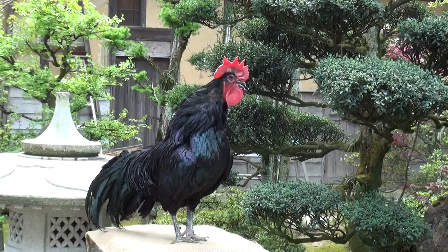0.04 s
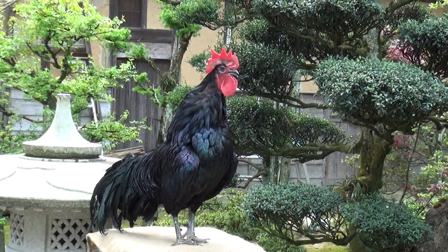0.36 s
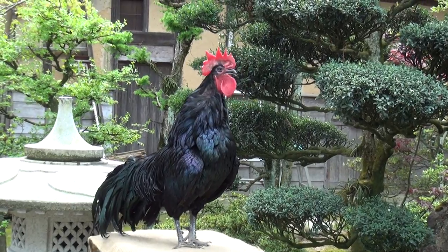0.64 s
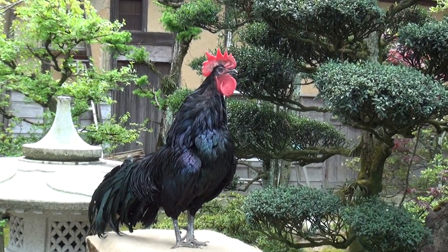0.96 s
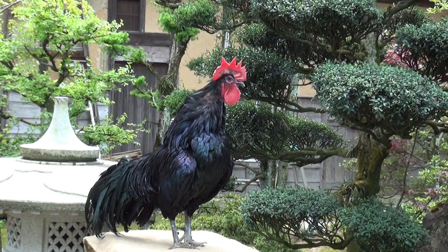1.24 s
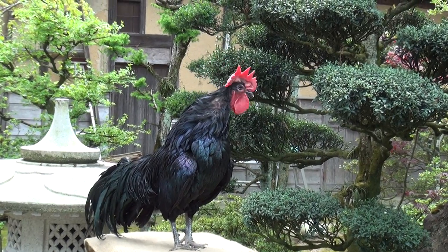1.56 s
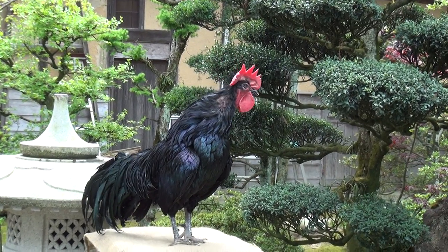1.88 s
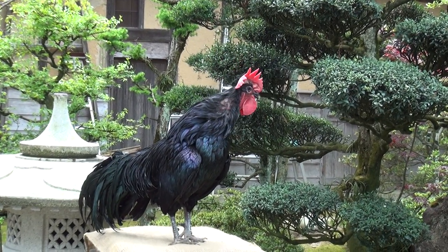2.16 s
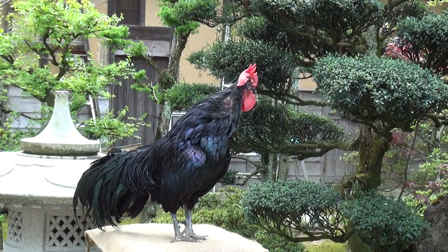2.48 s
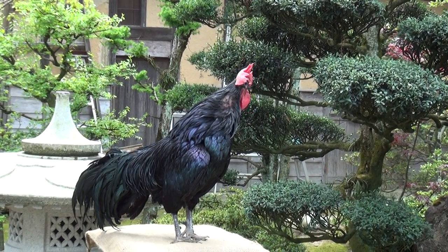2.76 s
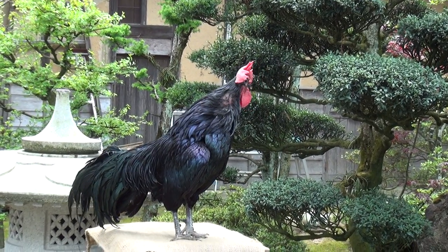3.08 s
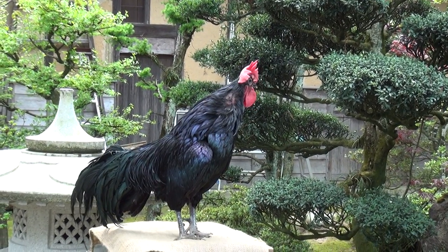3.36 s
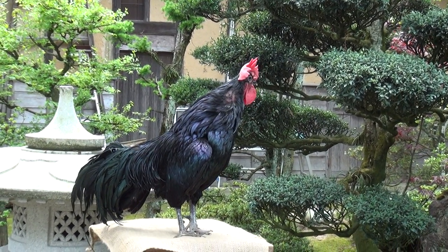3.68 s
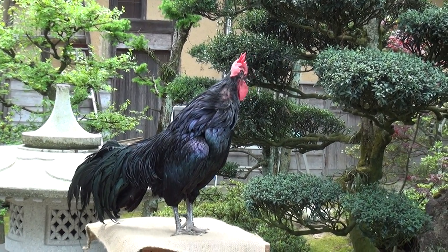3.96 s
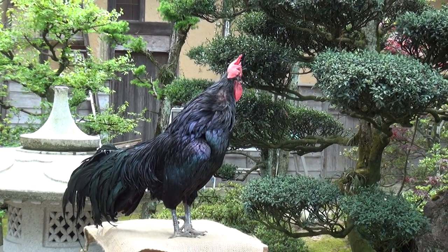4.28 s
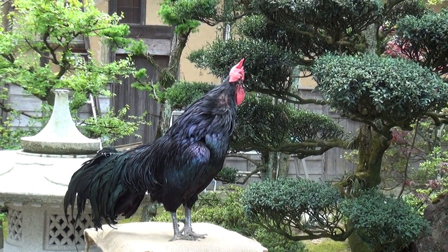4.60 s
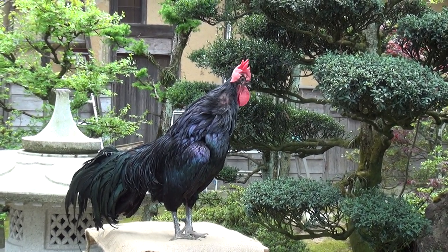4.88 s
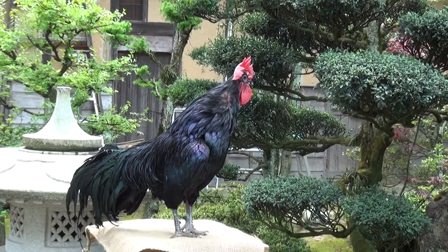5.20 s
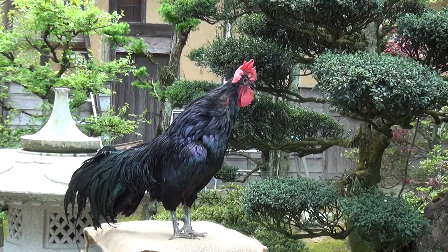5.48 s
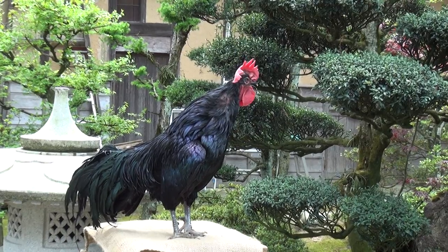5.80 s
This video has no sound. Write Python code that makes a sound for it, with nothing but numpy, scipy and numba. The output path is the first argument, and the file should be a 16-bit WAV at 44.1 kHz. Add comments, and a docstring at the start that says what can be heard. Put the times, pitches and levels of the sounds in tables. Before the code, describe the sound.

A close rooster crows three opening notes, then one very long harsh rasp, outdoors over a faint town rumble.

```python
"""A low town rumble and a brush of feathers, then a rooster crows close to the microphone in a walled
garden: a short note, a second that cracks upward, a clear one, then a very long rasp.
His syrinx swings regularly or breaks into chaotic beats; its pulses ring a throat and beak whose
resonances slide as he stretches his neck and runs out of air. The walls answer softly behind him."""
import sys
import numpy as np
from scipy import signal
from scipy.fft import rfft, irfft
from scipy.io import wavfile
from scipy.ndimage import uniform_filter1d, map_coordinates
from numba import njit

SR = 44100
rng = np.random.default_rng(int(sys.argv[2]) if len(sys.argv) > 2 else 0)


def file_out(sig):
    """Save sig as 16-bit WAV at sys.argv[1]."""
    # one column per channel
    cols = np.atleast_2d(sig).T
    # limit, then scale
    lim = np.clip(cols, -1, 1)
    pcm = np.round(lim * 32767).astype(np.int16)
    wavfile.write(sys.argv[1], SR, pcm)


N = 266364
TIME = np.arange(N) / SR


def undb(db):
    """Decibels to gain."""
    return 10 ** (np.asarray(db) / 20)


def curves(table):
    """The columns of a table, joined by straight lines in time."""
    times, *columns = np.transpose(sorted(table))
    return [np.interp(TIME, times, column) for column in columns]


def unit(x):
    """Scale to rms 1."""
    return x / np.std(x)


def steady(x, span_s):
    """Hold the rms at 1 over a sliding span."""
    size = max(int(span_s * SR), 8)
    power = uniform_filter1d(uniform_filter1d(x * x, size), size)
    return x / np.sqrt(np.abs(power) + 1e-14)


def wander(rate_hz):
    """Smooth random drift of spread 1."""
    return unit(map_coordinates(rng.standard_normal(8192), [TIME * rate_hz], order=3, mode="wrap"))


@njit
def bandpass(x, hz, width):
    """State-variable filter with moving centre and width, gain 1 at the centre."""
    y, band_state, low_state = np.empty(len(x)), 0., 0.
    for i in range(len(x)):
        g, damping = np.tan(np.pi * min(hz[i], .45 * SR) / SR), width[i] / hz[i]
        band = (band_state + g * (x[i] - low_state)) / (1 + g * (g + damping))
        band_state, low_state = 2 * band - band_state, low_state + 2 * g * band
        y[i] = damping * band
    return y


def resonate(x, hz, width):
    """A resonance with steep skirts."""
    hz, width = hz + np.zeros(N), width + np.zeros(N)
    return bandpass(bandpass(x, hz, width), hz, width)


def tract(x, modes, neck):
    """Parallel resonances of alternating sign that slide from the upright to the stretched posture."""
    return sum((-1) ** k * undb(db0 + (db1 - db0) * neck) * resonate(x, hz0 + (hz1 - hz0) * neck, width)
               for k, (hz0, hz1, width, db0, db1) in enumerate(modes))


def pulses(cycles, rough, scatter, uneven):
    """One sharp pulse a cycle; roughness scatters its moment and its size."""
    chance = rng.standard_normal((4400, 2))[:int(cycles[-1])]
    beat = np.arange(len(chance))
    wild = np.interp(beat, cycles, rough)
    at = np.interp(beat + scatter * wild * chance[:, 0], cycles, np.arange(N))
    taps = at.astype(int)[:, None] + np.arange(-7, 9)
    offset = taps - at[:, None]
    shape = np.sinc(offset) * np.cos(np.pi * offset / 16) ** 2
    size = 1 + uneven * wild * chance[:, 1]
    return np.bincount(np.clip(taps, 0, N - 1).ravel(), (shape * size[:, None]).ravel(), N)


# spectrum of the town beyond the walls: f/Hz, relative level/dB
TOWN_SPECTRUM = [(25, -21), (50, -6), (80, -6), (125, 1.5), (160, 1), (210, -4), (285, 1.5), (400, -11),
                 (800, -9.5), (1600, -19.5), (3000, -26.5), (8000, -32), (17000, -42)]
# swells of its rumble: t/s, half-width/s, rise/dB
TOWN_SWELLS = [(1.539, 0.28, 6), (4.1, 0.25, 4), (6.004, 0.095, 4)]


def town(level_db):
    """A distant, slowly swelling rumble, nearly alike in both capsules."""
    hz, db = np.transpose(TOWN_SPECTRUM)
    colour = undb(np.interp(np.log(np.fft.rfftfreq(N, 1 / SR) + 1), np.log(hz), db))
    mid, side = irfft(rfft(rng.standard_normal((2, N))) * colour, N)
    swell_db = sum(rise_db * np.exp(-((TIME - t) / width) ** 2) for t, width, rise_db in TOWN_SWELLS)
    rumble = unit(mid) * undb([[-1.4], [1.2]]) + undb(-17.5) * unit(side) * [[1], [-1]]
    return undb(level_db + swell_db) * rumble


def far_wall(x, delay_s, level_db):
    """The far wall sends one late, dull echo back to the microphone."""
    dull = signal.sosfilt(signal.butter(2, 900, fs=SR, output="sos"), x)
    return undb(level_db) * np.interp(TIME - delay_s, TIME, dull, left=0)


def garden(x, t60_s, wet_db, side_db):
    """Soft, scattered echoes from the walls and shrubs around the microphone."""
    t = TIME[:SR]
    tails = rng.standard_normal((2, SR)) * undb(-60 * t / t60_s) * (t > .008)
    tails = signal.sosfilt(signal.butter(1, 6000, fs=SR, output="sos"), tails)
    mid, side = (signal.fftconvolve(x, tail / np.linalg.norm(tail))[:N] for tail in tails)
    return undb(wet_db) * (mid + undb(side_db) * side * np.array([[1], [-1]]))


# reflections off the perch and nearby stone: delay with neck stretched/s, upright gain, stretched gain
NEAR_REFLECTIONS = [(.00115, 0.47, 0.083), (.00424, 0.28, 0.44), (.0045, .15, 0.05), (.0087, 0.2, 0.54)]


def near_stone(x, neck):
    """Close reflections comb the treble; their paths and strengths change as the head moves."""
    path = 1 + 0.139 * (1 - neck) + 0.0034 * wander(2.72)
    return x + sum((up + (out - up) * neck) * map_coordinates(x, [(TIME - delay * path) * SR], order=2)
                   for delay, up, out in NEAR_REFLECTIONS)


# rustles close to the microphone: t/s, length/s, level/dB
FEATHER_RUSTLES = [(0.139, 0.0037, -55), (0.33, 0.0049, -56), (1.068, 0.021, -44), (1.174, 0.0067, -34.5),
                   (1.193, 0.01, -43), (1.499, 0.11, -53)]


def feathers():
    """Brief, grainy brushes of stiff feathers."""
    strength = sum(undb(db) * np.exp(-2 * ((TIME - t) / length) ** 2)
                   for t, length, db in FEATHER_RUSTLES)
    grains = rng.standard_normal(N) * undb(4.1 * wander(1100))
    return strength * unit(resonate(grains, 2300, 2800) + 0.23 * resonate(grains, 12500, 14000))


# the bird's posture on the perch: t/s, stretch (0 upright, 1 stretched)
NECK_STRETCH = [(.2, 0.12), (.32, 0.18), (1.05, 0.17), (1.8, 0.17), (2.2, 0.61), (2.7, 0.81), (3.6, 0.75),
                (4.2, 1)]


def posture():
    """He stretches his neck as the crow goes on."""
    return curves(NECK_STRETCH)[0]


# the three opening notes, levels relative:
# start/s, end/s, attack/s, release/(dB/s), voice/dB, buzz/dB, beak ring/dB, top treble/dB
OPENING_NOTES = [(.197, 0.295, 0.013, 651, -20, -28.5, 17.5, -10),
                 (.456, 0.599, 0.02196, 110.5, -17.5, -26, -4.5, -25),
                 (.65, 1.056, 0.1362, 129.5, -18.5, -28, -18, -55)]
# effort in the long rasp, levels relative: t/s, voice/dB, buzz/dB
RASP_EFFORT = [(1.2, -30.5, -38.5), (1.65, -30, -38), (2.0, -28, -32), (2.2, -24.5, -32), (3.1, -21, -34),
               (3.7, -19.5, -32.5), (4.15, -19, -38.5), (5.4, -18.5, -37.5), (5.65, -18, -35.5),
               (6.04, -20, -34)]
RASP_START_S, RASP_ATTACK_S = 1.06, 0.038
RASP_RING_DB, RASP_BITE_DB = (17, 1), (-5.5, -28)  # upright, stretched


def effort(neck):
    """Gains of voice, buzz, ring and top treble, and the long rasp's share, as note follows note."""
    gates = [np.clip((TIME - start) / attack, 0, 1) * undb(-release * np.maximum(TIME - end, 0))
             for start, end, attack, release, *_ in OPENING_NOTES]
    gates.append(np.clip((TIME - RASP_START_S) / RASP_ATTACK_S, 0, 1))
    rasp_colour = [np.interp(neck, [0, 1], pair) for pair in (RASP_RING_DB, RASP_BITE_DB)]
    levels = [note[4:] for note in OPENING_NOTES] + [curves(RASP_EFFORT) + rasp_colour]
    voice_db, buzz_db, ring_db, bite_db = zip(*levels)
    shares = np.array(gates) / (sum(gates) + 1e-12)
    strength = lambda dbs: np.sqrt(sum((gate * undb(db)) ** 2 for gate, db in zip(gates, dbs)))
    blend = lambda dbs: sum(share * undb(db) for share, db in zip(shares, dbs))
    return strength(voice_db), strength(buzz_db), blend(ring_db), blend(bite_db), shares[-1]


# a close pair of narrow beak resonances: settled f/Hz, width/Hz, relative level/dB
RING_MODES = [(4758, 184, 2), (4970, 140, 2)]


def beak_ring(edge, lift_hz, settle_s):
    """The beak's ring starts high as it first opens, then settles."""
    lift = lift_hz * np.exp(-np.maximum(TIME - OPENING_NOTES[0][0], 0) / settle_s)
    return sum(undb(db) * resonate(edge, hz + lift, width) for hz, width, db in RING_MODES)


# mouth and beak resonances: upright f/Hz, stretched f/Hz, width/Hz, upright level/dB, stretched level/dB
BEAK_MODES = [(1890, 1826, 150, 3.5, 1.5), (2850, 2800, 700, -5, -44), (3000, 2830, 116, -10, -8),
              (4180, 3872, 410, 2.5, 2), (4930, 4750, 530, 3.5, 7.5), (5950, 5866, 465, 3, 3.5),
              (6590, 6476, 530, 4.5, -18), (6810, 7255, 470, 1, -2), (9240, 9240, 260, -49.5, -7.5),
              (9900, 10260, 1080, 0, -11.5), (11880, 11040, 760, -13, -10), (12800, 13000, 760, -14, -10),
              (14250, 14400, 980, -12, -13.5), (16400, 16700, 3000, -23, -30)]
# a side cavity of the throat, its resonance sinking as the air runs out: t/s, f/Hz, level/dB
SIDE_CAVITY = [(1.3, 6724, 4), (2.0, 6790, 9.5), (2.6, 6620, -32), (3.6, 5784, -7), (4.15, 4643, 0),
               (4.78, 4310, 2), (4.95, 3900, 12), (5.35, 3406, 0.5), (5.65, 2994, 4), (6.04, 2800, -2)]
# a high resonance that dips and recovers as the head turns off the microphone: t/s, f/Hz, level/dB
HEAD_TURN = [(1.2, 9630, -19), (1.55, 9100, 0), (2.05, 8205, -12), (2.6, 8970, -6.5), (4.2, 9510, -22),
             (5.3, 9340, -9), (5.7, 9100, -42)]
STRAIN_START_S, STRAIN_RISE_S = 4.75, 1
NOTCH_REST_HZ, NOTCH_ABOVE_HZ, NOTCH_WIDTH_HZ, NOTCH_DEPTH = 3500, 670, 660, 0.6


def beak(cycles, rough, neck, ring, bite, rasp_share):
    """The buzz: sharp closures and the air that escapes with them ring mouth and beak."""
    air = rng.standard_normal(N) * (1 + np.cos(2 * np.pi * cycles))
    leak = .11 + .55 * rough
    edge = unit(pulses(cycles, rough, scatter=0.1263, uneven=0.25)) + leak * air
    cavity_hz, cavity_db = curves(SIDE_CAVITY)
    turn_hz, turn_db = curves(HEAD_TURN)
    bright = tract(edge, BEAK_MODES, neck)
    bright += rasp_share * undb(cavity_db) * resonate(edge, cavity_hz, width=400)
    bright += undb(turn_db) * resonate(edge, turn_hz, width=550)
    # near the end of the breath the mouth tightens: the ring returns, with a sharp new resonance
    strain = np.clip((TIME - STRAIN_START_S) / STRAIN_RISE_S, 0, 1)
    bright += (ring + strain ** 2 * undb(1)) * beak_ring(edge, lift_hz=390, settle_s=0.038)
    bright -= strain * undb(5.5) * resonate(edge, hz=6107, width=161)
    bright += bite * resonate(edge, hz=10550, width=12000)
    # some closures snap harder than others, so the top treble crackles
    snap = undb(2.4 * rough * wander(400)) - 1
    bright += snap * resonate(bright, hz=10600, width=9000)
    # a hollow in the treble: in the long rasp the cavity cuts it just above its own resonance
    cavity_notch_hz = np.maximum(cavity_hz + NOTCH_ABOVE_HZ, NOTCH_REST_HZ)
    notch_hz = np.where(TIME < RASP_START_S, NOTCH_REST_HZ, cavity_notch_hz)
    depth = 1 - rasp_share + rasp_share * NOTCH_DEPTH
    for _ in range(2):
        bright -= depth * bandpass(bright, notch_hz, NOTCH_WIDTH_HZ + np.zeros(N))
    # the closures come in flurries of harder and softer ones
    flutter_db = wander(45) + 1.05 * wander(160)
    return steady(near_stone(bright, neck), span_s=0.05) * undb(flutter_db)


# windpipe and throat: upright f/Hz, stretched f/Hz, width/Hz, upright level/dB, stretched level/dB
THROAT_MODES = [(605, 639.6, 78.6, -1.5, 4.5), (750, 784, 123, -10, -10), (915, 927.6, 64, -7, 6),
                (1046, 979, 66, 3, 5.5), (1124, 1159.5, 117, -3.5, 8.5), (1260, 1216, 152, -12, 1),
                (1288, 1508, 164, 6.5, -8.5), (1565, 1720, 89, 3, -7.5), (1777, 1790, 160, -2, -52)]
NOTE_CHEST_DB, RASP_CHEST_DB = -37, (-5, -12.5)  # in the rasp: upright, stretched


def throat(cycles, neck, rasp_share):
    """Chaotic beats ring throat and chest; the membranes' swing is bounded, so the growl stays even."""
    beats = pulses(cycles, np.ones(N), scatter=0.5445, uneven=0.11)
    chest_db = (1 - rasp_share) * NOTE_CHEST_DB + rasp_share * np.interp(neck, [0, 1], RASP_CHEST_DB)
    chest = undb(chest_db) * resonate(beats, hz=505 + 30 * neck, width=143)
    return steady(tract(beats, THROAT_MODES, neck) - chest, span_s=0.0075)


# short catches in the long rasp: t/s, relative level/dB
VOICE_CATCHES = [(3.13, -54), (3.69, -41), (3.802, -28.5), (3.895, -27), (3.97, -35), (4.15, -25.5),
                 (4.386, -30), (4.602, -36), (4.743, -24.5), (4.823, -25), (5.189, -31.5), (5.363, -31.5),
                 (5.631, -30.5), (5.942, -37)]


def squeaks():
    """The rasp catches on an upper throat resonance; returns the squeaks and their envelope."""
    catch = sum(undb(db) * np.exp(-((TIME - t) / 0.0098) ** 2) for t, db in VOICE_CATCHES)
    hz = 1725 + 25 * wander(120)
    return catch * np.sin(2 * np.pi * np.cumsum(hz) / SR), catch


# spells when the syrinx locks into a regular swing:
# start/s, end/s, mid-spell f/Hz, glide/(Hz/s), added clarity/dB, octave/dB, buzz/dB
CLEAR_SPELLS = [(0.234, 0.289, 623, 122, 21, -2.5, 5), (0.494, 0.538, 633, 133, 12, -3, -3),
                (0.543, 0.597, 809, -150, 17.5, 6, -2.5), (0.603, 0.642, 632, -35, 35, -7.5, -6.5),
                (0.75, 0.811, 651.8, 38, 10.5, -1, -2), (0.803, 1.025, 654.9, 49.5, 37, 0, -6),
                (1.028, 1.055, 664, 96, 40, 1, -1), (1.059, 1.084, 639.7, -500, 41, 4.5, -4.5),
                (4.022, 4.125, 624.7, -35, 5, -11, -0.5), (4.209, 4.258, 613.8, 3, 7, -6.5, 0),
                (4.293, 4.363, 622, 0, 6, -12, -1), (4.851, 4.901, 627, 0, 4.5, -6, -0.5),
                (4.974, 5.013, 626.7, 0, 6.5, -9, -0.5), (5.224, 5.282, 618.8, -3, 6.5, -7.5, 0),
                (5.373, 5.445, 623, -76, 7.5, -8, -0.5), (5.447, 5.581, 611, 12, 39, -0.5, -1.5),
                (5.653, 5.711, 623.4, 200, 6.5, -11.5, 0)]
LOCK_S, BREAK_S = 0.00528, 0.00312  # how fast a spell sets in and breaks up
FULL_DB, FULL_HZ, TONE_OVER_RASP_DB, OCTAVE_DB = -19, 624.6, -2.18, -8  # at full voice
HZ_PER_DB, TONE_DB_PER_DB = 1.11, 0.78  # pitch and tonality rise with effort


def syrinx(voice):
    """Pitch, roughness, and octave and buzz gains: effort sets the first two, clear spells all four."""
    push_db = np.maximum(20 * np.log10(voice + 1e-9) - FULL_DB, -15)
    pitch = FULL_HZ + HZ_PER_DB * push_db
    clarity_db, octave_db, buzz_db = 0, OCTAVE_DB, 0
    for start, end, hz, glide, clear_db, second_db, sharp_db in CLEAR_SPELLS:
        # the pitch jumps at once; the tone clears more gradually
        ending = (1 - np.tanh((TIME - end) / BREAK_S)) / 2
        jump = ending * (1 + np.tanh((TIME - start) / BREAK_S)) / 2
        inside = ending * (1 + np.tanh((TIME - start) / LOCK_S + 1)) / 2
        pitch += jump * (hz + glide * (TIME - (start + end) / 2) - pitch)
        clarity_db += inside * (clear_db - clarity_db)
        octave_db += inside * (second_db - octave_db)
        buzz_db += inside * (sharp_db - buzz_db)
    rough = 1 / (1 + undb(TONE_OVER_RASP_DB + TONE_DB_PER_DB * push_db + clarity_db) ** 2)
    return pitch, rough, undb(octave_db), undb(buzz_db)


def rooster(neck):
    """Close up: two strong partials, a rasp in the throat and a buzz in the beak, all from one syrinx."""
    voice, buzz, ring, bite, rasp_share = effort(neck)
    pitch, rough, octave_ratio, sharpness = syrinx(voice)
    voice *= undb(1 - rough)  # a regular swing is a little stronger
    # roughness shares the voice's power between the rasp and the two partials
    rasp = voice * np.sqrt(rough)
    fundamental = voice * np.sqrt((1 - rough) / (1 + octave_ratio ** 2))
    octave = fundamental * octave_ratio
    # a rough voice keeps falling into step (+) and breaking up again (-), trading rasp for tone
    locked = np.tanh(2.5 * wander(48)) * np.sqrt(rough)
    fundamental *= undb(2.6 * locked + 2.2 * rough * wander(80))
    octave *= undb(4.2 * locked)
    rasp *= undb(-1.5 * locked)
    # the upright bird's clear notes carry a quick tremor in pitch and strength
    tremor_hz = 28 + 2.8 * wander(12.4)
    tremor = np.sin(2 * np.pi * np.cumsum(tremor_hz) / SR) * (1 - rough) * (1 - neck)
    pitch *= 1 + .012 * rough * wander(70) + 0.00131 * wander(90) + 0.0069 * tremor
    cycles = np.cumsum(pitch) / SR
    phase = 2 * np.pi * cycles
    tone = fundamental * np.sin(phase) + octave * np.sin(2 * phase + 1.1 + 2 * rough * wander(90))
    tone *= undb(1.06 * tremor)
    growl = rasp * throat(cycles, neck, rasp_share)
    # a squeak takes its energy from the two partials and sharpens the buzz
    squeak, catch = squeaks()
    tone = tone / (1 + (catch / 0.016) ** 2) + squeak
    buzz *= sharpness * (1 + 6 * catch) * undb(tremor)
    buzz *= beak(cycles, rough, neck, ring, bite, rasp_share)
    return np.sqrt(2) * undb(-1) * tone + undb(-1.08) * growl + undb(-3.5) * buzz


def scene():
    """The bird stands near the centre of the stereo pair and leans slightly right as he crows."""
    neck = posture()
    bird = rooster(neck) + feathers()
    pan_db = .3 - 1.25 * neck  # left over right
    # the treble reaches the two capsules slightly out of step
    treble = signal.sosfiltfilt(signal.butter(2, [1700, 9500], "bandpass", fs=SR, output="sos"), bird)
    spread = undb(-19.5) * np.imag(signal.hilbert(treble))
    direct = bird * undb(np.array([pan_db, -pan_db]) / 2) + spread * np.array([[1], [-1]])
    echoes = garden(bird, t60_s=0.46, wet_db=-16.5, side_db=-14.5)
    echoes += far_wall(bird, delay_s=.135, level_db=-19)
    return town(level_db=-48) + echoes + direct


OPEN_S, FADE_IN_S, TOP_HZ = .078, 0.015, 18200


def record(dry):
    """The microphone channel opens after a moment, and a steep low-pass cuts the top."""
    opened = np.clip((TIME - OPEN_S) / FADE_IN_S, 0, 1)
    return signal.sosfilt(signal.ellip(10, .2, 90, TOP_HZ, fs=SR, output="sos"), dry * opened)


dry = scene()
out = record(dry)
file_out(out)
```